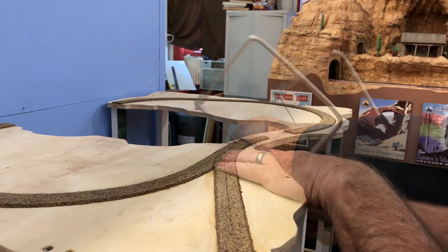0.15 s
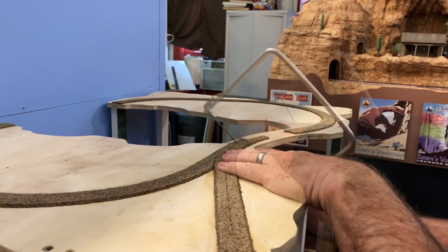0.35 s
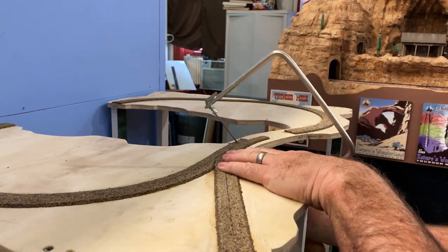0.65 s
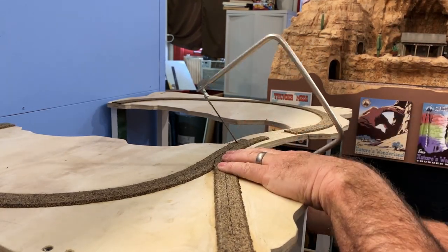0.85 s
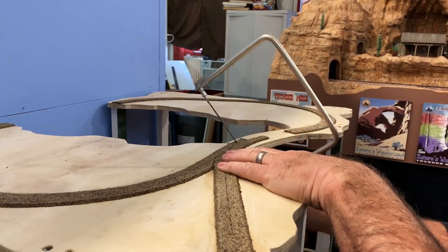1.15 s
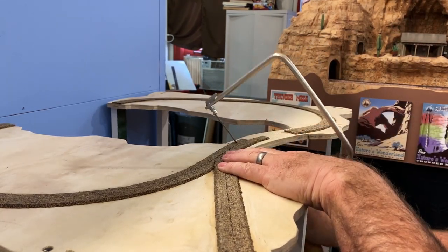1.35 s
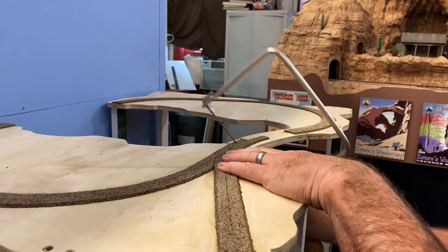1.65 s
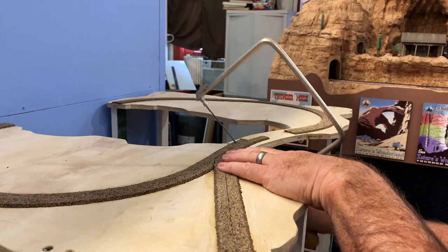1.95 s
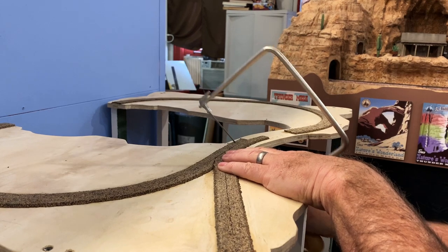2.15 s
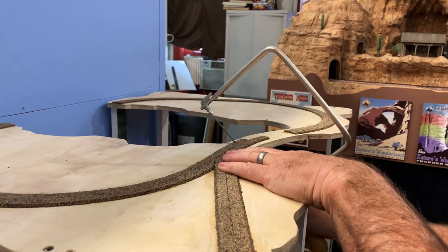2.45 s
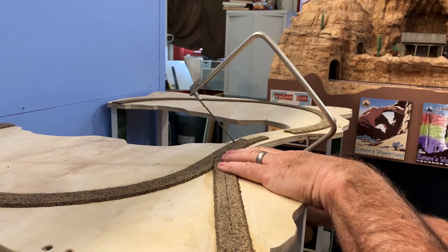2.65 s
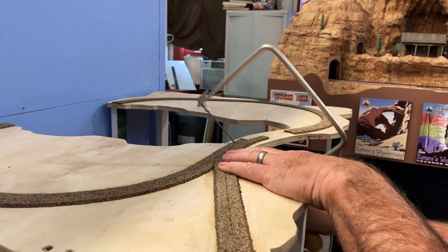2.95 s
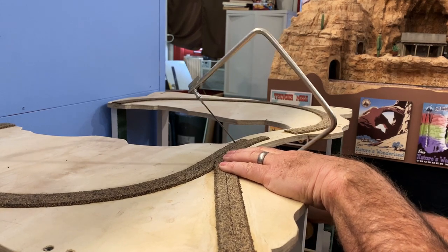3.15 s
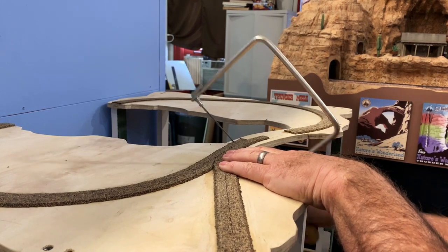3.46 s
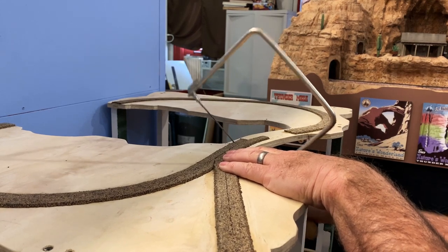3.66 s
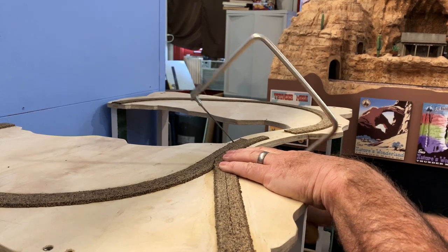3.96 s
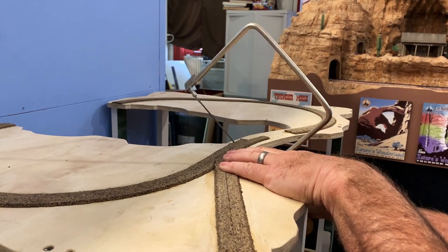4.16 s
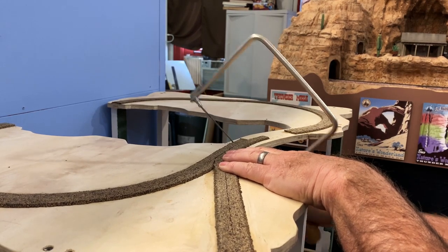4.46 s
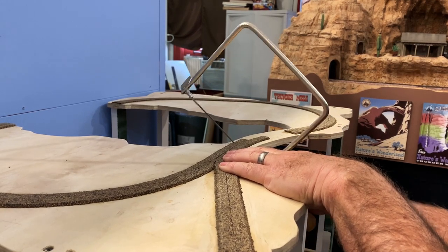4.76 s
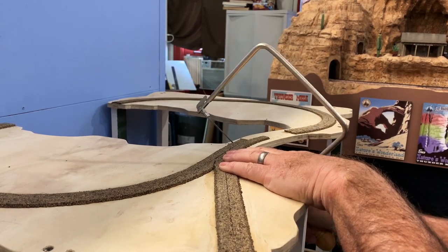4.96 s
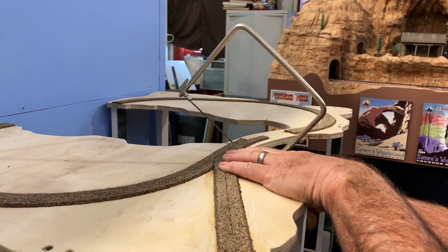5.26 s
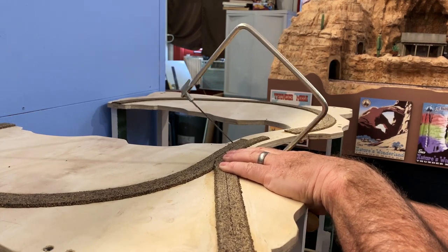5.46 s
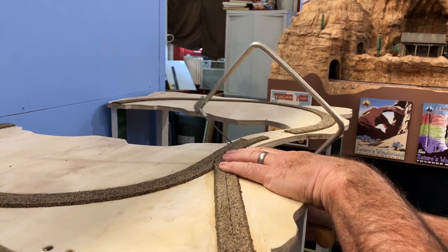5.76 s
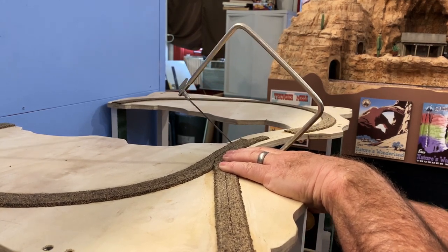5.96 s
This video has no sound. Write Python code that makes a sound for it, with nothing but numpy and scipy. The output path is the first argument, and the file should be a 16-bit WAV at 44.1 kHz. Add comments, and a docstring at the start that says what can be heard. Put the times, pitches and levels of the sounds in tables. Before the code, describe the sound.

Close, dry sawing in a small workshop: rough woody rasps alternate with quieter, lighter return scrapes in a steady two-part rhythm. The thin board resonates in the low mids while the metal frame adds a nasal buzz. Tiny blade clicks and frame knocks appear between some strokes. The pace starts quick, then eases until each stroke is longer, still sawing at the end. Barely any room tail or background noise.

```python
"""Hand saw in cork and plywood

A hand coping saw cuts cork strip and plywood on a bench, in quick strokes that gradually slow.
Teeth jolt and tear off crumbs, hard on the cut and lightly on the return; this shakes board and frame.
The frame jars as strokes start, the blade ticks as some end, and now and then it snags in the kerf.
Around it lie a short room tail and faint air noise."""
import sys
import numpy as np
from scipy import signal
from scipy.fft import rfft, irfft
from scipy.io import wavfile

SR = 44100
rng = np.random.default_rng(int(sys.argv[2]) if len(sys.argv) > 2 else 0)


def put_to_file(sound):
    """Save the sound as 16-bit audio at rate SR, in the file named by the first command-line argument."""
    columns = np.atleast_2d(sound).T  # one column per channel
    safe = np.clip(columns, -1, 1)
    whole_steps = np.round(safe * 32767)
    wavfile.write(sys.argv[1], SR, whole_steps.astype(np.int16))


N = 269430   # length in samples

# pitch ranges from thrum, knock, rasp, scrape to hiss: low f/Hz, high f/Hz, share of tooth jolts (0-1)
REGISTERS = [(40.4, 397, 0.44), (433, 896, 0.26), (1150, 2560, 0.22), (3320, 6550, 0.25), (8800, 14800, 0)]
# ringing tones (modes) of the plywood board: f/Hz, width/Hz, level/dB
BOARD_MODES = [(248.2, 10.8, 3.5), (289.1, 16.6, 3.5), (339.6, 39.5, -1.5), (388.4, 10.7, -5),
               (420.4, 27, -6), (472, 24, 0.5), (524.5, 13.1, 2), (550.6, 11.9, 1.5), (593, 18.3, -5),
               (681, 27, -6), (760, 17, -2.5), (812.3, 27.5, -7), (850, 26.5, -4.5), (916.7, 29, -3)]
# modes of the saw frame and blade: f/Hz, width/Hz, level/dB
SAW_MODES = [(1126, 55, -15), (1219, 13, -9.5), (1399, 66, -13.5), (1560, 55, -16), (1650, 69, -14.5),
             (1899, 32, -13.5), (1972, 28, -12), (2253, 73, -8.5), (2420, 70, -13), (2607, 89, -12),
             (3210, 157, -19.5), (3645, 170, -22.5), (4690, 192, -15.5), (5220, 345, -22),
             (5805, 680, -24.5), (6440, 162, -23.5), (6570, 230, -28), (10400, 610, -36),
             (10800, 2100, -41), (12330, 1000, -41.5), (12900, 910, -39)]
# modes of the bench under the board: f/Hz, width/Hz, level/dB
BENCH_MODES = [(59.4, 10, -36), (126.4, 9.2, -22), (198.6, 11.3, -21.5)]
# extra modes of the unloaded blade, free to ring on the return: f/Hz, width/Hz, level/dB
FREE_BLADE_MODES = [(13640, 130, -27), (4840, 57, -14)]
# ring of the taut blade when it slips: f/Hz, width/Hz, level/dB
SLIP_MODES = [(3100, 170, -27), (4550, 420, 5), (5780, 590, 5.5), (6600, 170, 8), (10140, 640, -11),
              (13200, 610, -5)]
# the blade snags and slips free: t/s, push on blade/dB, push on frame/dB
SNAGS = [(0.189, -51, -56), (.51, -45, -34.5), (1.239, -76, -43), (1.303, -55, -35.5), (2.738, -52, -48),
         (2.754, -51, -69), (3.187, -63, -73), (3.671, -45, -64), (3.849, -54, -30.5), (4.999, -70, -29),
         (5.314, -55, -33.5), (5.978, -40, -33.5)]
# colour of the still room air: f/Hz, relative level per Hz/dB
AIR_COLOUR = [(25, -7), (60, -12), (100, -25), (300, 14), (1000, 1.5), (3000, -5), (8000, -10.5),
              (14000, -13.5)]
# cutting strokes: start t/s, end t/s, lateness of top speed (1 = midway),
# force over the usual level/dB, boom of the board level/dB
CUTS = [(-0.002, .147, 0.65, -4, -0.59), (0.171, .378, .95, -6.5, 3.1), (0.596, .757, 0.7, -1.5, 0.95),
        (0.951, 1.096, 0.71, 1, -0.74), (1.291, 1.45, 0.83, -1, .5), (1.651, 1.814, 0.81, 2, 0.53),
        (2.009, 2.159, 0.99, -2.5, 1), (2.401, 2.545, 1.057, -0.5, 0.19), (2.806, 2.955, 0.74, -0.5, -1.7),
        (3.251, 3.408, .9, -2.5, -1.85), (3.709, 3.906, 0.72, -1, -0.039), (4.228, 4.442, .95, -1.5, 1),
        (4.836, 5.065, 1, -2, -1.94), (5.53, 5.783, 0.64, -1, 1)]
# return strokes: the same columns as the cuts
RETURNS = [(0.385, .604, 0.82, -1.5, 1), (0.765, 0.957, 0.9, 0, 2), (1.096, 1.275, 1, 3, 1.5),
           (1.462, 1.631, 0.95, 3, 0.5), (1.846, 1.99, 1.054, 2, 3.5), (2.215, 2.367, .9, 1.5, -1),
           (2.605, 2.78, 0.7, -3.5, -1), (2.998, 3.187, 1.15, -0.5, -2.5), (3.475, 3.66, 0.77, -2, 3.5),
           (3.955, 4.161, .8, -3, -2), (4.494, 4.683, 1, 2, 2), (4.739, 4.846, 0.56, -20.5, 2),
           (5.135, 5.374, 0.86, -1, 3.5), (5.805, 6.064, 0.9, 4.5, 3)]
# how each register, thrum to hiss, follows the blade on the cut:
# usual level/dB, dB per dB of force, power of blade speed or load, swell over the stroke/dB
CUT_FEEL = [(-42.5, 1.5, 1.05, 2.5), (-39.5, 1, 1.38, -4.5), (-45, 0.7, 1.5, -3), (-47.5, 0.4, 1.64, -3.5),
            (-54, 0.8, 2.6, 1)]
# the same on the return
RETURN_FEEL = [(-51, 1, 1.02, -2.5), (-46, 1, 1.7, -9.5), (-54, 0.55, 1.57, 1.5), (-63.5, 0.37, 1.72, 3.5),
               (-77, 0.46, 1.9, 3)]
# change in scrape and hiss on the cut: t/s, level/dB
CUT_TREBLE = [(.3, 0.5), (3.3, 0), (4.3, -3.5), (5.6, -1)]
# change in scrape and hiss on the return: t/s, level/dB
RETURN_TREBLE = [(.5, 6), (1.2, 3), (1.9, -3), (3.1, 0.5), (4.6, -7), (5.25, -0.5), (5.9, 3.5)]

AIR_DB = -75
TEETH_PER_STROKE = 48.0   # roughly: exact for a stroke fastest midway
LOAD_LAG = 1.14   # load on the board peaks later than the speed: ratio of the two latenesses
RASP_START_DB, RASP_BUILD_S = -7.5, 0.42   # the rasp starts weak and builds up over this time
SLIP_S = 0.0047   # decay time of a snag
# faint ticks near the end of a stroke: share of strokes, scatter either way, decay time
TICK_CHANCE, TICK_SCATTER_S, TICK_S = .4, 0.01, 0.0027
TICK_BLADE_DB, TICK_FRAME_DB = -63.5, -72   # push on each, before its ring is scaled
# the blade breaks loose: delay after the stroke starts, push at usual force, decay time
BREAK_DELAY_S, BREAK_DB, BREAK_S = .016, -35, 0.023
BREAK_BAND_HZ = (2700, 2750)   # the part of the frame's ring that is kept
CUTOFF_HZ = 14400


def from_db(db):
    """Turn decibels into a gain."""
    return 10 ** (np.asarray(db) / 20)


def rms_one(x):
    """Scale to an average strength (rms) of 1."""
    return x / np.sqrt(np.mean(x ** 2) + 1e-20)


def butter(x, hz, kind, order):
    """Filter smoothly, using only past samples (Butterworth)."""
    sections = signal.butter(order, np.clip(hz, 10, .45 * SR), kind, fs=SR, output="sos")
    return signal.sosfilt(sections, x + 1e-18)


def drift(rate_hz):
    """Wander smoothly at random, below the given rate, with rms 1."""
    return rms_one(butter(rng.standard_normal(N), rate_hz, "low", order=2))


def resonate(x, modes):
    """Ring a set of modes side by side, with alternating signs; wider modes die away sooner."""
    out = 0
    for k, (hz, width, db) in enumerate(modes):
        r = np.exp(-np.pi * width / SR)
        poles = [1, -2 * r * np.cos(2 * np.pi * hz / SR), r * r]
        gain = (-1) ** k * from_db(db) * (1 - r * r) / 2
        out = out + gain * signal.lfilter([1, 0, -1], poles, x + 1e-18)
    return out


def add(track, first, sound):
    """Mix a sound into a track from sample `first` on."""
    track[first:first + len(sound)] += sound[:N - first]


def air():
    """Faint steady room noise: random noise coloured by frequency."""
    hz, db = np.transpose(AIR_COLOUR)
    log_hz = np.log(np.fft.rfftfreq(N, 1 / SR) + 1)
    colour = from_db(np.interp(log_hz, np.log(hz), db))
    noise = irfft(rfft(rng.standard_normal(N)) * colour, N)
    return from_db(AIR_DB) * rms_one(noise)


def stroke_motion(start, end, lateness):
    """Samples of one stroke, its progress 0-1 and the blade speed, a half sine leaned early or late."""
    at = np.arange(max(int(start * SR), 0), min(int(end * SR), N))
    progress = np.clip((at / SR - start) / (end - start), 0, 1)
    speed = np.abs(np.sin(np.pi * progress ** lateness))
    return at, progress, speed


def teeth(jitter, uneven_db, tear_share, crumbs_per_s, crumb_db, crumb_share):
    """Each tooth gives a jolt, then fading tearing noise; crumbs snap at random: (jolts, tearing), rms 1."""
    rate = np.full(N, 60.0)   # teeth per second, at least this many
    for start, end, lateness, *_ in CUTS + RETURNS:
        at, progress, speed = stroke_motion(start, end, lateness)
        stroke_rate = TEETH_PER_STROKE * np.pi / 2 * speed / (end - start)
        rate[at] = np.maximum(rate[at], stroke_rate)
    passed = np.cumsum(rate * np.exp(jitter * drift(150))) / SR   # teeth gone by so far
    tooth = passed.astype(int)
    bite = from_db(uneven_db * np.clip(rng.standard_normal(N), -2, 1.7))[tooth]
    jolts = np.diff(tooth, prepend=0) * bite / np.sqrt(rate)
    tearing = rng.standard_normal(N) * bite * np.exp(-(passed % 1) / tear_share)
    crumb_sizes = rng.choice([-1, 1], N) * from_db(crumb_db * np.minimum(rng.exponential(1, N), 4))
    crumbs = (rng.random(N) < crumbs_per_s / SR) * crumb_sizes
    torn = rms_one(tearing) + crumb_share * rms_one(crumbs)
    return rms_one(jolts), rms_one(torn)


def stroke_levels(feel, treble, s, force_db, boom_db):
    """Level of each register in dB: all grow with the force of the arm; boom trades knock for thrum."""
    usual_db, force_share = np.transpose(feel)[:2]
    treble_db = np.interp(s, *np.transpose(treble))
    rasp_db = RASP_START_DB * max(1 - s / RASP_BUILD_S, 0)
    changes_db = np.array([boom_db, -boom_db, rasp_db, treble_db, treble_db])
    return usual_db + force_share * force_db + changes_db


def body_response(modes, vary_db, baffle_hz):
    """Answer of bench, board and saw to one jolt; each new contact point favours other modes."""
    jolt = signal.unit_impulse(SR // 6)
    touched = [(hz, width, db + vary_db * np.clip(rng.standard_normal(), -1.6, 1.6))
               for hz, width, db in modes]
    # the thin board radiates little bass: air slips round its edges
    board_and_saw = butter(resonate(jolt, touched), baffle_hz, "high", order=6)
    return board_and_saw + resonate(jolt, BENCH_MODES)


def sawing(strokes, feel, treble, modes, tooth_force, grip_db, vary_db):
    """The tooth force, shaped by the speed and load of each stroke, shakes bench, board and saw."""
    jolts, tearing = tooth_force
    grip = from_db(grip_db * drift(38.6))   # the cork grips unevenly
    out = np.zeros(N)
    for start, end, lateness, force_db, boom_db in strokes:
        at, progress, speed = stroke_motion(start, end, lateness)
        load = stroke_motion(start, end, lateness * LOAD_LAG)[2]
        levels_db = stroke_levels(feel, treble, (start + end) / 2, force_db, boom_db)
        body = body_response(modes, vary_db, baffle_hz=227.0)
        # the frame speaks as soon as the blade moves; the board thrums and knocks as the teeth dig in
        drives = [load, load, speed, speed, speed]
        for register, register_feel, level_db, drive in zip(REGISTERS, feel, levels_db, drives):
            low_hz, high_hz, jolt_share = register
            *_, power, swell_db = register_feel
            swelling = from_db(level_db + swell_db * (progress - .5))
            force = swelling * drive ** power * grip[at]
            jolt_share = np.clip(jolt_share, 0, 1)
            grain = np.sqrt(jolt_share) * jolts[at] + np.sqrt(1 - jolt_share) * tearing[at]
            body_band = butter(body, [low_hz, high_hz], "band", order=3)
            sound = signal.fftconvolve(force * grain, body_band)
            # give the sound the same total energy as the force curve
            add(out, at[0], sound * np.linalg.norm(force) / np.linalg.norm(sound))
    return out


def breakaways():
    """Static friction gives way just after each stroke starts; a noise burst rings a narrow frame band."""
    t, slips = np.arange(SR // 10) / SR, np.zeros(N)
    for start, _, _, force_db, _ in CUTS + RETURNS:
        slip = rng.standard_normal(len(t)) * np.exp(-t / BREAK_S)
        first = max(int((start + BREAK_DELAY_S) * SR), 0)
        add(slips, first, from_db(BREAK_DB + force_db) * slip)
    return butter(resonate(slips, SAW_MODES), BREAK_BAND_HZ, "band", order=2)


def turning_ticks():
    """Some strokes end in a faint slip as the blade turns: rows of t/s, blade/dB, frame/dB, decay/s."""
    ends = [end for _, end, *_ in CUTS + RETURNS]
    ticks = []
    for end, (luck, when) in zip(ends, rng.random((len(ends), 2))):
        if luck < TICK_CHANCE:
            s = min(end + TICK_SCATTER_S * (2 * when - 1), (N - 1) / SR)
            ticks.append((s, TICK_BLADE_DB, TICK_FRAME_DB, TICK_S))
    return ticks


def snags(blade_ring_db, frame_ring_db):
    """Each snag or turning tick is a tiny burst of friction that rings the blade and jars the frame."""
    t, blade, frame = np.arange(SR // 20) / SR, np.zeros(N), np.zeros(N)
    slips = [(*snag, SLIP_S) for snag in SNAGS] + turning_ticks()
    for s, blade_db, frame_db, decay_s in slips:
        slip = rng.standard_normal(len(t)) * np.exp(-t / decay_s)
        add(blade, int(s * SR), from_db(blade_db) * slip)
        add(frame, int(s * SR), from_db(frame_db) * slip)
    blade_ring = from_db(blade_ring_db) * resonate(blade, SLIP_MODES)
    frame_ring = from_db(frame_ring_db) * resonate(frame, SAW_MODES)
    return blade_ring + frame_ring


def workshop(x, wet_db, t60, wall_hz):
    """Add a short diffuse tail, duller than the direct sound, that falls 60 dB in t60 seconds."""
    t = np.arange(SR // 2) / SR
    tail = rng.standard_normal(len(t)) * from_db(-60 * t / t60) * (t > .004)
    tail = butter(tail, wall_hz, "low", order=1)
    return x + from_db(wet_db) * signal.fftconvolve(x, tail / np.linalg.norm(tail))[:N]


def scene():
    """Cuts, returns, breakaways and snags in the workshop, over the room air."""
    biting = teeth(jitter=.16, uneven_db=1.5, tear_share=1.0,
                   crumbs_per_s=900, crumb_db=2.5, crumb_share=0.58)
    sliding = teeth(jitter=.08, uneven_db=1.4, tear_share=0.67,
                    crumbs_per_s=550, crumb_db=2.5, crumb_share=0.8)
    cut_modes = BOARD_MODES + SAW_MODES
    return_modes = cut_modes + FREE_BLADE_MODES
    cuts = sawing(CUTS, CUT_FEEL, CUT_TREBLE, cut_modes, biting, grip_db=1.55, vary_db=2.0)
    returns = sawing(RETURNS, RETURN_FEEL, RETURN_TREBLE, return_modes, sliding, grip_db=1.28, vary_db=4.0)
    saw = cuts + returns + breakaways() + snags(blade_ring_db=3.0, frame_ring_db=17)
    room = workshop(saw, wet_db=-15.5, t60=0.1, wall_hz=3800)
    return (room + air())[None]


def record(dry):
    """Cut the top steeply above the cutoff frequency."""
    steep = signal.ellip(10, .2, 70, CUTOFF_HZ, fs=SR, output="sos")
    return signal.sosfilt(steep, dry)


dry = scene()
out = record(dry)
put_to_file(out)
```